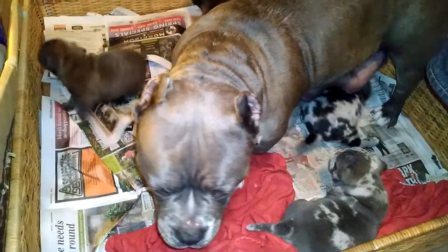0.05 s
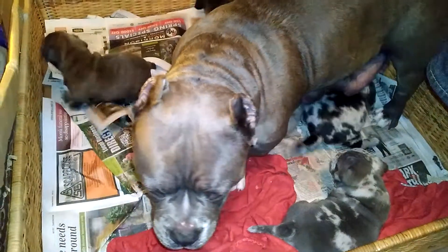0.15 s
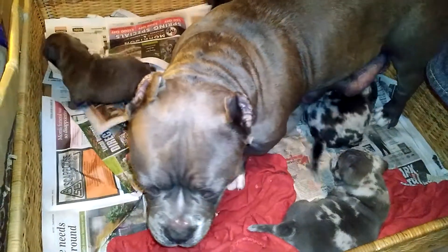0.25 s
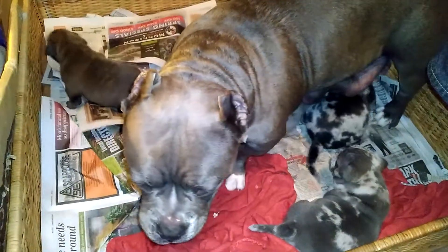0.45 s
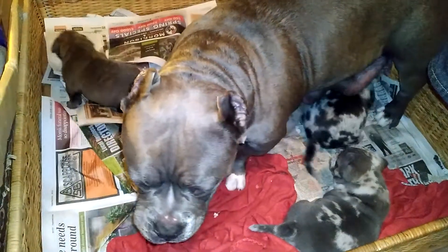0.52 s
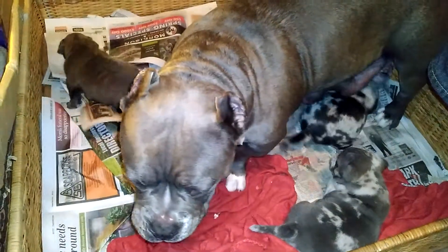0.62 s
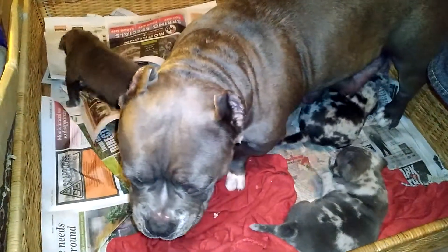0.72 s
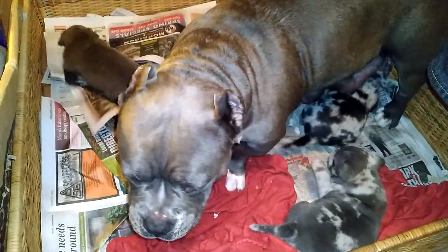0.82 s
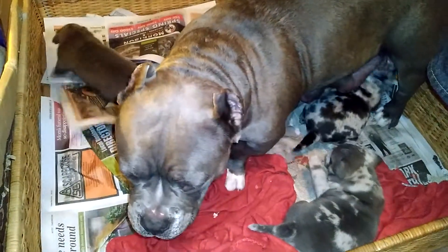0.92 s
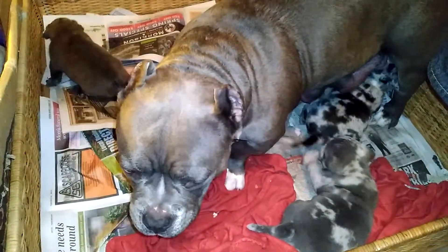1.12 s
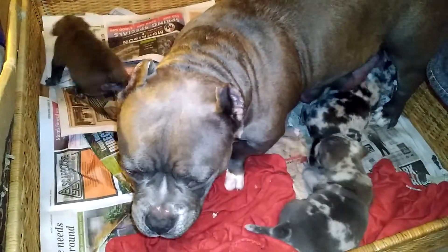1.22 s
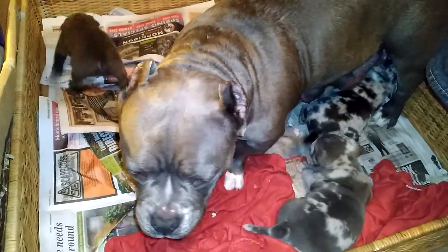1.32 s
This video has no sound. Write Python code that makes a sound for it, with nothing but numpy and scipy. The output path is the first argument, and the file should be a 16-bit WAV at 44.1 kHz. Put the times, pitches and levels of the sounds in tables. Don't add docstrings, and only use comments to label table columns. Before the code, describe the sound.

Newspaper crinkling under shuffling puppies, heard close in a small soft room. Silence until 0.13 s, then a small crackle at 0.2 and light dragging strokes. From 0.45 to 0.85 rustling thickens, with a soft thud near 0.64 and low wicker rumble and creaks. Sharp bright snaps cluster at 0.85-1.0, loudest about 0.9. Then near quiet, faint thuds around 1.2 and a last brief crackle at 1.29.

```python
import sys
import numpy as np
from scipy import signal
from scipy.fft import rfft, irfft
from scipy.io import wavfile
from scipy.ndimage import uniform_filter1d, map_coordinates

SR = 44100
rng = np.random.default_rng(int(sys.argv[2]) if len(sys.argv) > 2 else 0)


def undo_db(level):
    steps = np.asarray(level, float) / 20
    return 10 ** steps


def bounce(signal):
    frames = np.transpose(np.atleast_2d(signal))
    limited = np.clip(frames, -1, 1)
    pcm = np.round(limited * 32767).astype(np.int16)
    wavfile.write(sys.argv[1], SR, pcm)


N = 59535
T = np.arange(N) / SR


def unit(x):
    return x / np.sqrt(np.mean(x ** 2))


def colour(x, curve):
    hz, db = np.array(curve, float).T
    log_bins = np.log(np.maximum(np.arange(2049) * SR / 4096, 5))
    log_points = np.log(np.r_[hz[0] / 3, hz])
    gain_db = np.interp(log_bins, log_points, np.r_[db[0] - 30, db])
    cepstrum = irfft(gain_db * np.log(10) / 20)
    cepstrum[1:2048] *= 2
    cepstrum[2049:] = 0
    impulse = irfft(np.exp(rfft(cepstrum)))
    return signal.fftconvolve(x, impulse[None], axes=1)[:, :N]


def walk(rate_hz):
    hold = int(SR / rate_hz)
    steps = np.repeat(rng.standard_normal(N // hold + 1), hold)
    return unit(uniform_filter1d(steps, hold)[:N])


def sides(db):
    return undo_db(np.array([db, -db]) / 2)


def pair(alike):
    noise = rng.standard_normal((3, N))
    return np.sqrt(alike) * noise[0] + np.sqrt(1 - alike) * noise[1:]


# freq_hz, gain_db
HUSH_CURVE = [(200, -4.5), (700, -13.5), (1500, -9), (4500, -10.5), (9000, -11), (13000, -19.5),
              (16000, -13)]


def hush():
    hush_db = -77
    return undo_db(hush_db) * unit(colour(pair(0.067), HUSH_CURVE))


# time_s, load_db, creak_db over the load
LOAD = [(.13, -85.5, -2.5), (.23, -68.5, 0.5), (.5, -63.5, 2), (.6, -65, 1.5), (.74, -62, 2),
        (0.886, -66, 2.5), (.93, -73.5, -4.5), (1.05, -79, -6), (1.11, -90, 4), (1.26, -80, -11),
        (1.29, -73.5, -4.5), (1.35, -89, 8.5)]
# freq_hz, gain_db
RUMBLE_CURVE = [(25, -23), (50, 5.5), (100, 11.5), (150, -2.5), (260, -17)]
# freq_hz, gain_db
CREAK_CURVE = [(120, -9.5), (220, 1.5), (350, -6), (520, 0.5), (950, -11), (1600, -32)]


def basket():
    time_s, load_db, creak_db = np.array(LOAD).T
    load_db = np.interp(T, time_s, load_db)
    creak_db = load_db + np.interp(T, time_s, creak_db)
    rumble = unit(colour(pair(0.77), RUMBLE_CURVE)) * undo_db(load_db + 1.6 * walk(30.2))
    creak = unit(colour(pair(0.85), CREAK_CURVE)) * undo_db(creak_db + 2.4 * walk(61.54))
    return rumble + creak


# start_s, peak_db, pitch_hz, decay_cycles
PAW_THUDS = [
    (0.6405, -46.5, 110, 1.3),
    (1.145, -73, 70, 1.3),
    (.18, -70, 120, 1.4),
    (.655, -57, 50, 1.6),
    (0.752, -54, 69, 1.1),
    (1.2095, -57, 92, 1.5),
    (1.2295, -59, 62, 1.7),
    (0.26, -65.5, 55, 2.7),
    (1.029, -68, 99, 0.7),
]


def thuds():
    rise_cycles = 0.3
    out = 0
    for start_s, peak_db, pitch_hz, cycles in PAW_THUDS:
        phase = np.clip((T - start_s) * pitch_hz, 0, None)
        shape = np.exp(-(phase / cycles) ** 2) * np.clip(phase / rise_cycles, 0, 1)
        out = out - undo_db(peak_db) * np.sin(2 * np.pi * phase) * shape
    return out


# start_s, level_db, pitch_hz, length_s
PAPER_RINGS = [(.2022, -52, 2800, 0.001), (0.282, -57, 930, 0.027), (0.203, -47, 12100, 0.0064),
               (1.209, -69, 253, .01), (0.283, -51.5, 5200, 0.013), (.3512, -44, 2220, 0.0027),
               (0.3584, -50, 2300, 0.005), (.5088, -45, 4220, 0.0065), (.512, -55, 1400, 0.017),
               (0.561, -52, 1160, 0.0079), (0.715, -53.5, 2640, 0.026), (0.893, -42.5, 2080, 0.0095),
               (0.896, -48.5, 1310, 0.013), (0.899, -50, 1730, 0.021), (0.901, -33, 4930, 0.0036),
               (0.87, -56, 1690, 0.0091), (.77, -51, 12000, .012), (.718, -48, 4070, 0.023),
               (.224, -63.5, 610, 0.0068), (.325, -62.5, 210, .025), (1.001, -50.5, 2140, 0.0064),
               (.722, -62, 546, 0.0205), (.44, -59, 1115, 0.019), (.967, -56, 5400, 0.014),
               (.3305, -52, 6100, .003), (.509, -53, 6100, .008), (0.993, -59, 480, 0.017),
               (0.998, -62, 310, 0.012), (0.999, -54.5, 914, 0.011), (.998, -50, 1720, 0.012),
               (1.122, -58, 5800, 0.01), (1.124, -66.5, 1150, 0.005), (1.13, -65, 6750, 0.025),
               (1.159, -65.5, 6700, 0.025), (1.274, -59, 3700, 0.012), (1.263, -69, 970, 0.037),
               (1.287, -54, 1250, 0.014), (1.288, -60, 1800, 0.014), (1.28, -69.5, 335, 0.012)]


def rings():
    resonance_q = 3
    out = 0
    for start_s, level_db, pitch_hz, length_s in PAPER_RINGS:
        p = np.clip((T - start_s) / length_s, 0, None)
        shape = (1 - np.exp(-6 * p)) * np.exp(-p ** 2)
        b, a = signal.iirpeak(pitch_hz, resonance_q, fs=SR)
        ring = signal.lfilter(b, a, pair(0.62) * shape)
        ring = signal.lfilter(b, a, ring)
        energy = np.sum(ring ** 2, axis=1, keepdims=True)
        out = out + ring * undo_db(level_db) * np.sqrt(np.sum(shape ** 2) / energy)
    return out


# start_s, level_db, length_s, flap_db of the whole sheet, left_right_db
DRAGS = [(0.134, -62.5, 0.18, -12, -2), (0.193, -61.5, 0.031, -14, -7), (.22, -58.5, 0.089, -13, 2),
         (0.283, -49, 0.065, -11, 1.5), (0.35, -54.5, 0.11, -11.5, .5), (0.351, -50.5, 0.0098, -3.5, -3),
         (0.427, -48.5, 0.064, -12, -0.5), (0.502, -47.5, .026, -8, -1), (0.527, -54.5, 0.086, -8, -1.5),
         (0.6104, -48, 0.042, -8.5, -1), (0.669, -51, 0.086, -5.5, -0.5), (0.7163, -46, 0.029, -4, -2),
         (0.758, -47, 0.046, -8, 1.5), (0.807, -46, 0.032, -10, 0.5), (0.848, -48, 0.036, -7, 0),
         (0.878, -50, 0.014, -14, 4), (0.897, -48, 0.031, -11, 3.5), (0.935, -57.5, 0.052, -8.5, -4.5),
         (0.965, -53, .015, -15, -1), (0.977, -44.5, 0.034, -26, -0.5), (1.02, -53, 0.024, -22, -2.5),
         (1.044, -63, 0.022, -22, 2), (1.12, -68.5, 0.054, -10, 3), (1.275, -61, 0.013, -15, -2),
         (1.284, -50, 0.012, -18.5, -2.5), (1.31, -66, 0.041, -11, 2.5)]


def rustle():
    grip_s, let_go_s = 0.0026, 0.014
    cracks_per_s, scatter_db, loudest = 2500, 1.5, 3.5
    rustle_db, slide_db, swell_db, wander_db = -5, 1, 1.0, 7.5
    crisp, dull = 0, 0
    for start_s, level_db, length_s, flap_db, side_db in DRAGS:
        grip = np.clip((T - start_s) / grip_s, 0, 1)
        let_go = np.exp(-np.clip(T - start_s - length_s, 0, None) / let_go_s)
        power = (grip * let_go * undo_db(level_db) * sides(side_db)[:, None]) ** 2
        crisp = crisp + power
        dull = dull + power * undo_db(2 * flap_db)
    size = undo_db(scatter_db * np.minimum(rng.exponential(size=N), loudest))
    cracks = (rng.random(N) < cracks_per_s / SR) * rng.uniform(-0.88, 1, N) * size
    swarm = unit(cracks) * sides(wander_db * walk(300))
    swarm = swarm + undo_db(slide_db) * pair(0.033)
    swarm = swarm * undo_db(rustle_db + swell_db * walk(120))
    return swarm * np.sqrt(crisp), swarm * np.sqrt(dull) * undo_db(11)


BUCKLE_TIMES = [.2023, .2073, .2115, .2835, .3635, .472, .4895, .509, .6148, .6218, .6268, .7143, .7355,
                .7465, .8118, .8532, .858, .8823, .8915, .9015, .9058, .912, .921, .9838, .9915, .9965,
                1.015, 1.124, 1.2273, 1.2885, .2034, .6125, .6305, .6345, .6445, .772, .8165, .821, .863,
                .8865, .903, .9145, .918, .9865, .9935, .9995, 1.002, 1.0355, .308, 1.2985, .4625]
# peak_db, spray_length_s, left_right_db
BUCKLES = [(-28, 0.0005, 0), (-34.5, 0.0007, -8), (-34.5, 0.0013, 8), (-40, 0.0019, 0), (-34, 0.0026, 4.5),
           (-38, 0.0013, -1), (-45, 0.00079, -3), (-33, 0.001, -12), (-34, 0.00067, -2), (-30, 0.00081, -7),
           (-31, 0.00064, 17), (-29, 0.001, 20), (-30.5, 0.0026, 5), (-28.5, 0.002, -10),
           (-27.5, 0.0032, 2), (-21.5, 0.002, 0.5), (-27.5, 0.0011, 2), (-25, 0.0024, 3),
           (-21, 0.0033, 2.5), (-20.5, 0.0018, 4), (-12, 0.0014, 0.5), (-27, 0.0013, 0), (-34, .0015, -2),
           (-26.5, 0.0021, -0.5), (-23, 0.00079, -4), (-24, 0.00065, -7), (-30.5, 0.00075, -5),
           (-46, 0.0027, -4), (-51, 0.0015, 0), (-31, 0.0034, 8.5), (-30, 0.00065, 1), (-36, 0.0018, 7),
           (-34, 0.00093, 0), (-32, 0.0011, 7), (-32, .001, 0), (-34.5, 0.0018, 0), (-33, .001, 0),
           (-30, .001, 4), (-29, .0015, 0), (-35, .001, -6), (-16, 0.0018, 4), (-24, 0.0009, 0),
           (-30, 0.0012, -1), (-26, 0.0013, -3), (-22, .001, -1), (-25, 0.0011, 2), (-27, .001, -5),
           (-33.5, 0.00085, 2), (-34, .0008, 0), (-36, .0008, 3), (-36, 0.00074, 2)]
# top_octave_db, flap_db of the sheet
BUCKLE_TONES = [(3, -2), (0, -7), (8, -8), (2, 1.5), (-7, -3), (5, -3), (5, -3), (-5, -4), (-2, -2), (0, 0),
                (-3, -3), (-11, 5), (-4, -9.5), (-8, -4.5), (0, -2), (0, -2), (-4, -6), (1, -0.5),
                (-12, -4), (-5, -4.5), (-11, -6.5), (-9, -1), (-6, 0), (1, -8.5), (4, -5), (-5, -3),
                (-5, -2), (-8, 1), (-3, 4), (-14, -3.5), (-4, -9), (-4, 4.5), (-1, -5), (-3, -7), (-3, -11),
                (5, 0), (-2, -7), (3, -3), (-3, -1), (-2, -5), (-16, -7), (-6, -5), (-4, -5), (-2, -6),
                (-2, -5), (0, -1.5), (-4, -6), (-3, -5), (2, -2), (0, -5), (3, -9)]


def snaps():
    snap_db, rise_s, top_octave_hz = -11, 0.00048, 10950
    first_crack = 5
    t = T[:3000]
    crack = np.zeros((2, N + len(t)))
    flap = np.zeros((2, N + len(t)))
    low = signal.butter(4, top_octave_hz, "low", fs=SR, output="sos")
    high = signal.butter(4, top_octave_hz, "high", fs=SR, output="sos")
    for start_s, (peak_db, spray_s, side_db), (air_db, flap_db) in zip(BUCKLE_TIMES, BUCKLES, BUCKLE_TONES):
        spray = rng.standard_normal((3, len(t)))
        spray[0, 16] += first_crack * np.sign(spray[0, 16])
        decay = np.exp(-t / max(spray_s, 3e-4)) + 0.41 * np.exp(-t / 0.00095)
        shape = decay * (1 - np.exp(-t / rise_s))
        burst = (spray[0] + 1.13 * spray[1:]) * shape
        burst = burst * undo_db(peak_db + snap_db) * sides(side_db)[:, None]
        i = int(start_s * SR)
        crack[:, i:i + len(t)] += signal.sosfilt(low, burst) + undo_db(air_db) * signal.sosfilt(high, burst)
        flap[:, i:i + len(t)] += burst * undo_db(flap_db)
    return crack[:, :N], flap[:, :N]


# freq_hz, gain_db
CRACK_CURVE = [(1500, -23.5), (3000, -4), (5000, -1), (7000, -3), (9000, -2.5), (11000, -2.5), (13000, -6),
               (16000, -10.5)]
# freq_hz, gain_db
FLAP_CURVE = [(500, -22), (800, -6.5), (1200, -3.5), (2000, -0.5), (3200, -4), (6000, -41.5)]


def paper():
    right_late_s = 0.00013
    rustle_crisp, rustle_flap = rustle()
    snap_crisp, snap_flap = snaps()
    crisp = colour(rustle_crisp + snap_crisp, CRACK_CURVE)
    flap = colour(rustle_flap + snap_flap, FLAP_CURVE)
    left, right = crisp + flap + rings()
    right = map_coordinates(right, [(T - right_late_s) * SR], mode="nearest")
    return np.array([left, right])


def room(x):
    t60_s, tail_db = 0.11, -4
    t = T[:SR // 4]
    tail = rng.standard_normal((2, len(t))) * np.exp(-np.log(1000) * t / t60_s) * (t > 0.002)
    tail = tail / np.sqrt(np.sum(tail ** 2, axis=1, keepdims=True))
    return x + undo_db(tail_db) * signal.fftconvolve(x, tail, axes=1)[:, :N]


def scene():
    return room(paper()) + basket() + thuds() + hush()


def top_cut(x):
    return signal.sosfilt(signal.butter(12, 16080, fs=SR, output="sos"), x)


def record(dry):
    port_hz, port_width_hz, port_db = 9400, 980, 13
    start_s, fade_s, top_hz = 0.1298, 0.0015, 15950
    b, a = signal.iirpeak(port_hz, port_hz / port_width_hz, fs=SR)
    whistle = signal.lfilter(b, a, dry)
    fade = np.clip((T - start_s) / fade_s, 0, 1)
    mix = (dry + undo_db(port_db) * whistle) * fade
    lowpass = signal.ellip(12, 0.2, 80, top_hz, fs=SR, output="sos")
    mix = signal.sosfilt(lowpass, mix)
    return top_cut(mix)


dry = scene()
out = record(dry)
bounce(out)
```